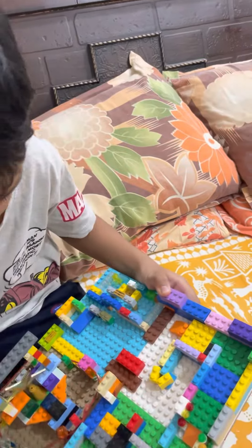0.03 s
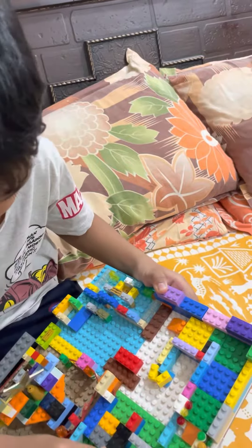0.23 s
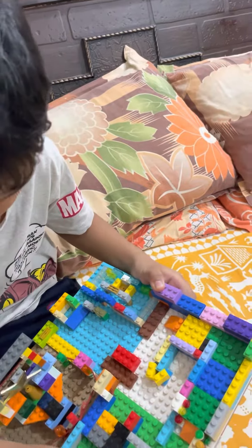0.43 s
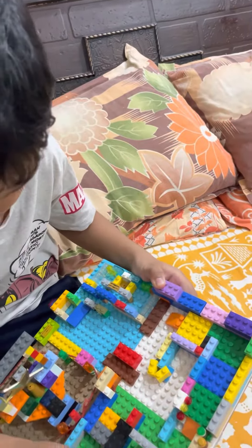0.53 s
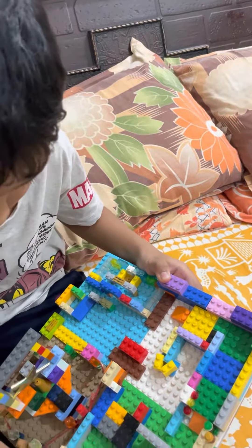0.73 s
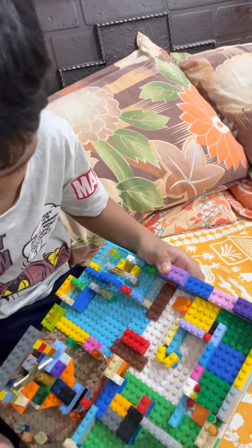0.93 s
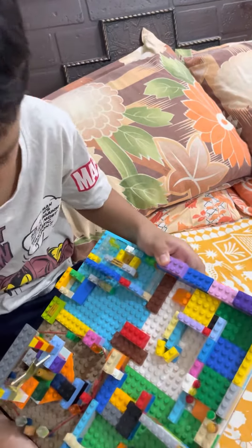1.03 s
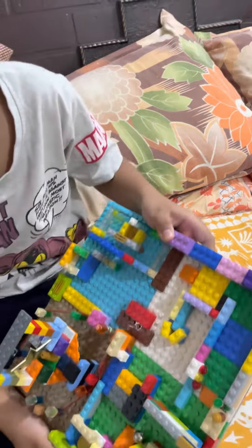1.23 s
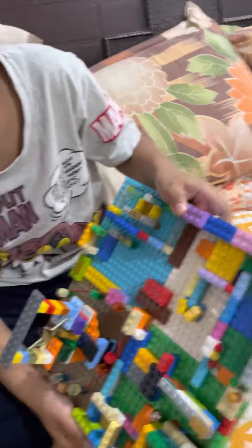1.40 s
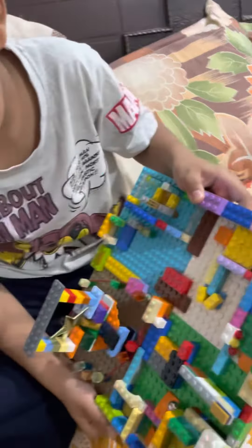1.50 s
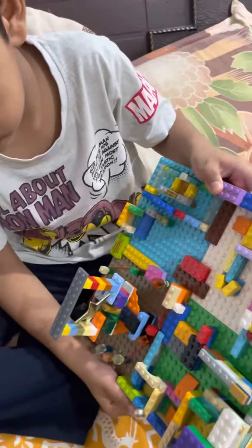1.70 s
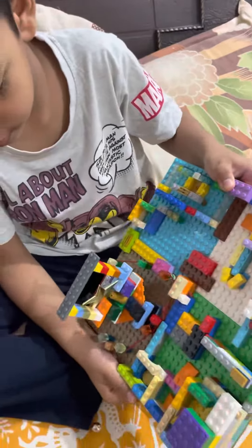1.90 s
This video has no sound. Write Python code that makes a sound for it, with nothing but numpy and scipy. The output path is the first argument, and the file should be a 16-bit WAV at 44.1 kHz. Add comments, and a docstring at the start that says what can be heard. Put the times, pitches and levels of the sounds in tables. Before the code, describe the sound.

Close by in a quiet bedroom, a marble knocks through a toy-brick maze with bright, hollow clacks. A faint rolling whirr and light ticks lead to another burst of clacks, followed by soft bumps on the bed.

```python
"""A marble clacks through a maze of plastic toy bricks in two flurries: each blow rings the studded
baseplate and the brick it meets, with a bright snap. Around the blows it skids, whirrs and rattles
over the studs. A child tilts the board on a bed, so it rumbles and bumps softly on the bedding.
The quiet bedroom gives the clacks and the rattle a short tail."""
import sys
import numpy as np
from scipy import signal
from scipy.fft import rfft, irfft
from scipy.io import wavfile
from scipy.ndimage import uniform_filter1d

SR = 44100
rng = np.random.default_rng(int(sys.argv[2]) if len(sys.argv) > 2 else 0)


def persist_wave(psi):
    """Save psi, clipped to +-1, as 16-bit WAV."""
    counts = np.round(np.clip(psi, -1, 1) * 32767).astype(np.int16)
    wavfile.write(sys.argv[1], SR, np.atleast_2d(counts).T)


N = 85995
TIME_S = np.arange(N) / SR
RING_S = np.arange(8192) / SR  # time within one blow

# blows on the walls (time [s], plate part, plate level [dB], plate centre [Hz], narrowness [dB/oct^2],
# brick level [dB], brick pitch [Hz], snap level [dB], contact cut-off [Hz],
# brick left over right [dB], brick left-right lag [ms])
CLACKS = [(0.1400, "middle", -57, 450, 11.5, -70, 2500, -99, 4000, 4.5, -0.069),
          (0.2133, "middle", -20, 1065, 10, -49, 1450, -34, 8100, -12, 0),
          (0.2226, "middle", -26.5, 955, 3, -42, 1650, -57, 4500, .5, 0.059),
          (0.3022, "middle", -12, 799, 5, -5, 3062, -15, 15300, -3.5, 0.074),
          (0.3240, "middle", -22.5, 850, -0.5, -22, 2750, -29.5, 6270, 10, 0.043),
          (0.4042, "middle", -29, 940, 4.5, -30, 2120, -44, 3940, 0, 0),
          (0.4387, "middle", -35, 694, 4, -38.5, 5740, -38, 9900, 1, -0.044),
          (0.5168, "middle", -33.5, 756, 1.5, -43, 2770, -48, 8170, -16, -0.053),
          (0.5270, "middle", -31.5, 823, 9.5, -63, 1620, -70.5, 3940, -5, 0),
          (0.5465, "middle", -39, 749, 4, -49.5, 5720, -51, 8900, 4, 0),
          (1.0120, "middle", -56, 1313, 9, -49.5, 1920, -55, 7050, 1, 0.98),
          (1.1532, "corner", -54.5, 1016, 3.5, -59, 3420, -52, 8000, 10, -0.044),
          (1.4928, "corner", -53, 1098, -2.5, -55.5, 1900, -68.5, 3970, 5.5, 0),
          (1.541, "corner", -23, 1016, 1.5, -22.5, 1700, -30, 7260, -1.5, -0.0013),
          (1.5919, "corner", -12, 1470, 4.5, -23, 4850, -11.5, 15000, -26.5, -0.02),
          (1.6255, "corner", -19.5, 1520, 2.5, -8.5, 3384, -15, 12200, 1, -0.1),
          (1.6835, "corner", -25, 949, 5.5, -37, 1760, -34, 4060, 9, 2)]

def clack(part, plate_db, centre_hz, narrow, brick_db, brick_hz, snap_db, contact_hz, pan_db, lag_ms):
    """The marble hits a wall: plate, body and brick ring; a soft contact dulls the whole blow."""
    knock = plate(part, centre_hz, narrow) + body(centre_hz, narrow)
    pan = amp(np.array([[.5], [-.5]]) * pan_db)
    blow = amp(plate_db) * knock + pan * amp(brick_db) * brick(brick_hz, lag_ms) + amp(snap_db) * snap()
    pole = np.exp(-2 * np.pi * contact_hz / SR)
    return signal.lfilter([1 - pole], [1, -pole], blow)


# baseplate modes by part of the maze (frequency [Hz], level [dB], t60 [s])
PLATE_MODES = {"middle": [(242, -13.5, 0.046), (312, -8, 0.044), (410.7, -11.5, 0.018), (491.7, -6, .035),
               (591, -7, 0.083), (670, -12, .05), (817, 5, 0.041), (898, -3, 0.12), (948.6, -1, 0.054),
               (1005, -11, .04), (1311, -2.5, 0.025), (1447, -6, .04), (1457, -9, 0.069),
               (1793.6, -0.5, 0.04), (2435, -6, 0.11)], "corner": [(333, -13.5, 0.11), (404, -6, 0.069),
               (637, -4.5, 0.081), (701.3, -5.5, 0.065), (786.6, -6, .09), (815, -8.5, 0.038),
               (1056.7, -1, .075), (1184, -12, 0.038), (1387, 4.5, 0.045), (1470, -1.5, 0.035),
               (1697, -4.5, 0.066), (2010, -7, 0.025), (2105, -6, .075), (2650, -9, .05)]}
PLATE_RISE_S, ONE_RADIAN_APART_HZ = 0.00077, 2400

def plate(part, centre_hz, narrow):
    """Hollow ring of one part of the baseplate."""
    rows = favoured(PLATE_MODES[part], centre_hz, narrow)
    return modes(rows, PLATE_RISE_S, lambda hz: (hz / ONE_RADIAN_APART_HZ) ** 2)


# spectrum of the assembly (frequency [Hz], relative density [dB])
BODY_SPECTRUM = [(100, -18.5), (220, -13.5), (400, -5), (800, -6), (1600, -9.5), (2400, -11.5),
                 (4000, -14.5), (8000, -35), (16000, -47)]
# its stereo image (frequency [Hz], left-right correlation)
BODY_STEREO = [(300, 1), (800, .92), (1600, .7), (3000, .2), (8000, 0)]
BODY_DB = -5

def body(centre_hz, narrow):
    """Dense, quickly damped modes of the whole assembly, as a noise burst."""
    dense = noise(favoured(BODY_SPECTRUM, centre_hz, narrow), BODY_STEREO, len(RING_S))
    return amp(BODY_DB) * dense * ring(PLATE_RISE_S, t60_s=0.044)


# brick modes (ratio to pitch, level [dB], t60 [s])
BRICK_MODES = [(.61, -8, .025), (.8, -10.5, .018), (0.872, -10, .025), (.94, -13.5, .015),
               (0.999, 0.5, .017), (1.069, -9, .022), (1.142, -8, .016), (1.228, -6, .014),
               (1.761, -24, .025), (1.88, -29.5, .03)]

def brick(pitch_hz, lag_ms):
    """Short ring of the struck brick."""
    rows = [(ratio * pitch_hz, db, t60_s) for ratio, db, t60_s in BRICK_MODES]
    return modes(rows, rise_s=0.00025, apart_rad=lambda hz: 2 * np.pi * hz * lag_ms / 1000)


# snap spectrum (frequency [Hz], relative density [dB])
SNAP_SPECTRUM = [(500, -14.5), (2000, -6), (3800, -1.5), (5400, 8.5), (6500, -3), (7600, -20.5),
                 (9000, -2.5), (10000, -6), (12000, -11.5), (14000, -20.5), (15600, -11.5), (16400, -18),
                 (17000, -29.5)]
# its stereo image (frequency [Hz], left-right correlation)
SNAP_STEREO = [(1000, 0.43), (3000, .2), (5500, .4), (9000, -0.37), (15000, 0.22)]

def snap():
    """Bright noise burst at contact."""
    return noise(SNAP_SPECTRUM, SNAP_STEREO, len(RING_S)) * ring(rise_s=.0009, t60_s=0.016)


# rattle envelope (time [s], level [dB])
RATTLE_LEVEL = [(1.42, -88), (1.485, -57.5), (1.497, -48.5), (1.535, -51), (1.58, -54), (1.62, -100)]

def rattle():
    """Stud impacts ring the plate as the marble gathers speed."""
    response = plate("corner", centre_hz=750, narrow=4)
    drive = unit(studs()) + 1.3 * rng.standard_normal(N)
    return level(RATTLE_LEVEL) * unit(signal.fftconvolve(drive[None], response, axes=1)[:, :N])


# whirr envelope (time [s], level [dB])
ROLL_LEVEL = [(0, -77.5), (.045, -85.5), (.08, -65), (.2, -59), (.45, -54.5), (.68, -65), (.76, -79),
              (.9, -104), (.99, -79), (1.06, -69), (1.25, -64), (1.42, -61), (1.6, -57.5), (1.75, -76),
              (1.83, -80.5), (1.95, -74)]
# whirr spectrum (frequency [Hz], relative density [dB])
ROLL_SPECTRUM = [(150, -33), (300, -9.5), (540, -7), (900, -15.5), (1150, -4), (1400, 1.5), (1620, -0.5),
                 (1900, -12), (2700, -14.5), (3500, -13), (4600, -24.5), (5700, -22), (6700, -31.5),
                 (7500, -43), (10000, -37), (12000, -39.5), (16000, -62)]
# its stereo image (frequency [Hz], left-right correlation)
ROLL_STEREO = [(300, 0.56), (800, 0), (1600, 1), (3000, 0), (16000, 0.41)]
# rolling treble, growing with speed (time [s], level [dB])
FIZZ_LEVEL = [(0, -100), (.1, -102), (.5, -83.5), (.65, -100), (1.05, -93), (1.25, -78), (1.42, -74),
              (1.52, -81), (1.7, -90)]
# its spectrum (frequency [Hz], relative density [dB])
FIZZ_SPECTRUM = [(2000, -27.5), (4000, -7), (5000, -2), (5800, 5.5), (6700, -2), (7600, -21.5),
                 (9500, -4.5), (12000, -10.5), (13500, -21.5), (16000, -29.5)]
TICKS_DB, SWELL_DB, SWELL_S = -11, 1.5, 0.041

def rolling():
    """Hissy whirr with fine ticks, swelling and sinking from stud to stud."""
    ticks = colour(np.array([studs(), studs()]), ROLL_SPECTRUM, ROLL_STEREO)
    swell = unit(uniform_filter1d(rng.standard_normal(N), round(SWELL_S * SR)))
    whirr = level(ROLL_LEVEL) * (noise(ROLL_SPECTRUM, ROLL_STEREO, N) + amp(TICKS_DB) * ticks)
    fizz = level(FIZZ_LEVEL) * noise(FIZZ_SPECTRUM, ROLL_STEREO, N)
    return amp(SWELL_DB * swell) * (whirr + fizz)


def studs(rate_per_s=89, spread_db=3.5):
    """Random small impacts of the marble on the studs."""
    hits = rng.random(N) < rate_per_s / SR
    strength = amp(spread_db * np.minimum(rng.exponential(1, N), 3))
    return hits * strength * rng.choice([-1, 1], N)


# skids (time [s], length [s], hiss level [dB], squeak level [dB], squeak pitch [Hz])
SKIDS = [(0.046, 0.067, -65, -72, 3330), (1.042, 0.078, -71, -68, 3510)]
# skid hiss (frequency [Hz], relative density [dB])
SKID_SPECTRUM = [(800, -6.5), (2500, -8), (3600, -4.5), (6200, -10), (7500, -32), (10000, -20),
                 (12500, -27), (15000, -27)]
SQUEAK_SKIRT_HZ = 220

def skids():
    """The marble rubs on plastic as it starts to move: hiss and a faint squeak."""
    out = np.zeros((2, N))
    for start_s, length_s, hiss_db, squeak_db, hz in SKIDS:
        size = round(length_s * SR)
        peak = [(hz / 2, -60), (hz - SQUEAK_SKIRT_HZ, -15), (hz, 0),
                (hz + SQUEAK_SKIRT_HZ, -15), (2 * hz, -60)]
        hiss = amp(hiss_db) * noise(SKID_SPECTRUM, ROLL_STEREO, size)
        squeak = amp(squeak_db) * noise(peak, ROLL_STEREO, size)
        arch = np.sin(np.pi * np.linspace(0, 1, size) ** 0.63)
        add(out, start_s, (hiss + squeak) * arch)
    return out


# rumble envelope (time [s], level [dB])
RUMBLE_LEVEL = [(0, -65), (.15, -61.5), (.25, -53), (.38, -58.5), (.5, -59), (.58, -56.5), (.7, -56),
                (.81, -53), (.87, -66), (1, -66.5), (1.1, -67.5), (1.27, -61), (1.38, -59.5), (1.45, -53),
                (1.53, -65), (1.75, -58.5), (1.95, -53.5)]
# rumble spectrum (frequency [Hz], relative density [dB])
RUMBLE_SPECTRUM = [(20, -46.5), (36, -24.5), (55, 5.5), (75, -6.5), (110, -11.5), (180, -16.5),
                   (400, -35.5), (1500, -72)]
# stereo image of rumble and air (frequency [Hz], left-right correlation)
LOW_STEREO = [(30, 1), (150, .92), (500, .4), (3000, .1)]
# bumps on the bed (time [s], level [dB], pitch [Hz], t60 [s])
BUMPS = [(1.804, -38, 180.7, 0.079), (1.816, -29, 82.8, 0.093), (1.864, -37.5, 87, 0.084),
         (1.916, -51, 80.3, 0.36)]
BUMP_RISE_S = 0.0044

def handling():
    """The tilted board rumbles and bumps softly on the bedding."""
    out = level(RUMBLE_LEVEL) * noise(RUMBLE_SPECTRUM, LOW_STEREO, N)
    for start_s, db, hz, t60_s in BUMPS:
        add(out, start_s, -amp(db) * ring(BUMP_RISE_S, t60_s) * np.sin(2 * np.pi * hz * RING_S))
    return out


# early reflections (delay [s], left gain, right gain)
ECHOES = [(.0031, .12, 0.11), (.0087, .27, 0.16), (.0128, .13, .11), (.0172, .1, .08), (.0228, 0.057, 0.13)]
# tail decay (frequency [Hz], t60 [s])
TAIL_T60 = [(150, .45), (400, 0.3), (800, 0.38), (1500, 0.35), (3000, 0.29), (4800, 0.3), (6500, 0.38),
            (11000, 0.25), (15000, 0.25)]
# tail spectrum before decay (frequency [Hz], relative density [dB])
TAIL_SPECTRUM = [(150, 3), (400, 2), (700, 0), (1500, -5.5), (2400, 5), (3200, -1), (5000, -5), (6200, -4),
                 (7800, -10), (10000, -3.5), (12300, 0.5), (14000, -16), (16000, 3.5)]
# its stereo image (frequency [Hz], left-right correlation)
TAIL_STEREO = [(100, 1), (400, .9), (800, 0.71), (1400, .4), (2400, 0), (16000, -.1)]
ECHO_CUTOFF_HZ, TAIL_DB, TAIL_RISE_S = 2600, -9, 0.0072

def room(x):
    """Direct sound, dulled reflections from close by, then a diffuse tail."""
    out = x.copy()
    dull = signal.lfilter(*signal.butter(1, ECHO_CUTOFF_HZ, fs=SR), x)
    for delay_s, left, right in ECHOES:
        add(out, delay_s, dull * [[left], [right]])
    hz, t, bands = signal.stft(noise(TAIL_SPECTRUM, TAIL_STEREO, SR), SR, nperseg=256)
    decay = np.exp(-np.log(1000) * t / read(TAIL_T60, hz)[:, None])
    tail = signal.istft(bands * decay, SR, nperseg=256)[1][:, :SR]
    onset = 1 - np.exp(-(TIME_S[:SR] / TAIL_RISE_S) ** 2)
    tail = unit(tail * onset) / np.sqrt(2 * SR)
    return out + amp(TAIL_DB) * signal.fftconvolve(x, tail, axes=1)[:, :N]


# room tone (frequency [Hz], relative density [dB])
AIR_SPECTRUM = [(20, -29), (35, -18), (55, -10), (90, -4), (230, -21.5), (440, -17.5), (600, -29.5),
                (1300, -28), (2100, -36.5), (5600, -39.5), (7300, -56.5), (10700, -53.5), (16000, -60.5)]
AIR_DB = -71

def still_air():
    """Faint, steady hush of the bedroom."""
    return amp(AIR_DB) * noise(AIR_SPECTRUM, LOW_STEREO, N)


def favoured(rows, centre_hz, narrow):
    """The struck spot weakens modes far from its centre pitch; narrow is in dB/oct^2."""
    return [(hz, db - narrow * min(np.log2(hz / centre_hz) ** 2, 3), *rest) for hz, db, *rest in rows]


def modes(rows, rise_s, apart_rad):
    """Decaying sines of alternating sign; apart_rad(hz) is the phase between left and right."""
    out = 0
    for k, (hz, db, t60_s) in enumerate(rows):
        phase = 2 * np.pi * hz * RING_S + np.array([[-.5], [.5]]) * apart_rad(hz)
        out = out + (-1) ** k * amp(db) * ring(rise_s, t60_s) * np.sin(phase)
    return out / np.sqrt(sum(amp(db) ** 2 for _, db, _ in rows))


def ring(rise_s, t60_s):
    """Quick rise, exponential decay."""
    return (1 - np.exp(-RING_S / rise_s)) * np.exp(-np.log(1000) * RING_S / t60_s)


def noise(spectrum, stereo, size):
    """Coloured stereo noise, rms 1."""
    return colour(rng.standard_normal((2, size)), spectrum, stereo)


def colour(x, spectrum, stereo):
    """Gives two independent channels a spectrum and a correlation, rms 1."""
    hz, bins = np.fft.rfftfreq(x.shape[1], 1 / SR), rfft(x)
    correlation = np.clip(read(stereo, hz), -1, 1)
    mid, side = bins[0] * np.sqrt(1 + correlation), bins[1] * np.sqrt(1 - correlation)
    shaped = np.array([mid + side, mid - side]) * amp(read(spectrum, hz))
    return unit(irfft(shaped, x.shape[1]))


def read(points, hz):
    """Table lookup on a log-frequency axis."""
    knots_hz, values = np.transpose(points)
    return np.interp(np.log(hz + 1), np.log(knots_hz + 1), values)


def level(points):
    """Gain over time from a dB curve."""
    return amp(np.interp(TIME_S, *np.transpose(points)))


def amp(db):
    """Decibels to gain."""
    return 10 ** (np.asarray(db) / 20)


def unit(x):
    """Scales to rms 1."""
    return x / np.sqrt(np.mean(x ** 2) + 1e-20)


def add(mix, start_s, sound):
    """Mixes a sound in, in place."""
    part = mix[:, round(start_s * SR):][:, :sound.shape[-1]]
    part += sound[..., :part.shape[1]]


def scene():
    """Clacks and rattle in the room, over rolling, skids, handling and still air."""
    board = rattle()
    for start_s, *blow in CLACKS:
        add(board, start_s, clack(*blow))
    return room(board) + rolling() + skids() + handling() + still_air()


def record(dry):
    """Steep low-pass on the top treble."""
    lowpass = signal.firwin(511, cutoff=16400, window=("kaiser", 9), fs=SR)
    return signal.oaconvolve(dry, lowpass[None], "same")


dry = scene()
out = record(dry)
persist_wave(out)
```